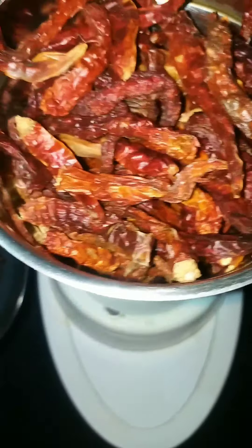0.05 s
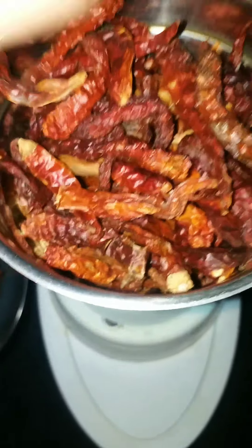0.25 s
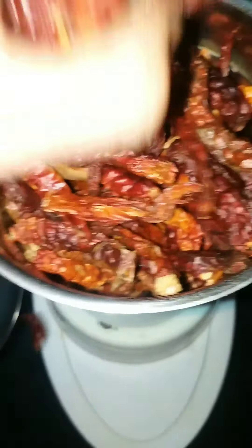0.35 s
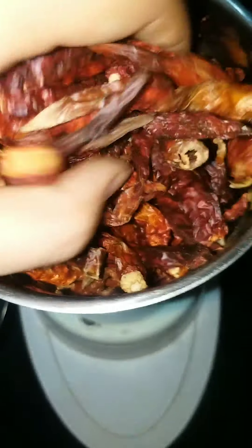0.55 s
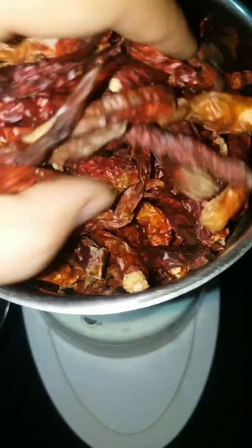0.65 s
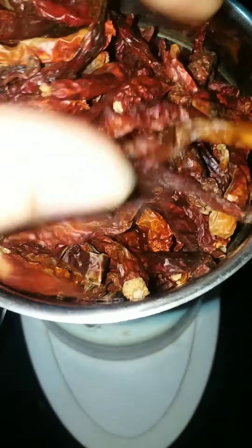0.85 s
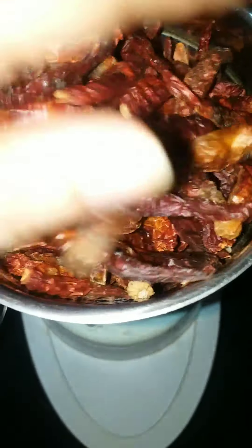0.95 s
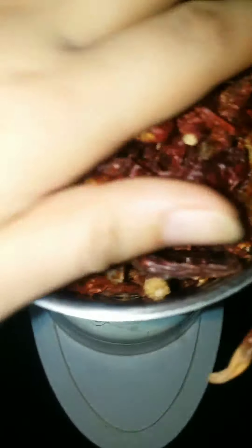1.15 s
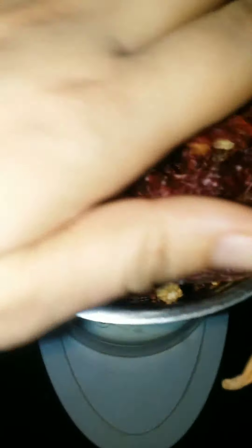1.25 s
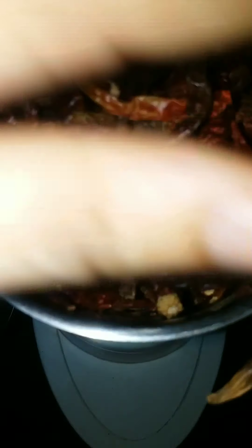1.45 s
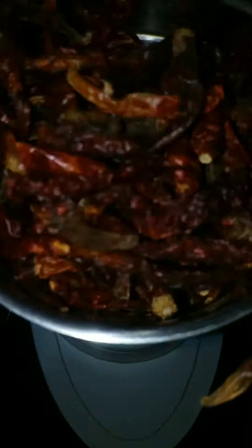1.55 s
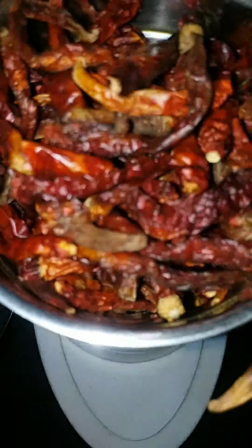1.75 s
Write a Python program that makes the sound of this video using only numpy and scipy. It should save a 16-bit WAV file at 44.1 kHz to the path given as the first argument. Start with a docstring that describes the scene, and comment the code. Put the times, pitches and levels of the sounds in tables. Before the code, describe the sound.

Brittle dried chilli pods rustle, snap and tick together, lifted by hand in a metal bowl.

```python
"""A kitchen, close up: a hand digs into dried chillies in a steel bowl, lifts them, lets them slide back.
The hollow pods snap and ring briefly, their papery skins crackle, and the heap shifts in the bowl.
A pod rubs the steel and makes it sing. The room adds a short echo and the low hum of an appliance."""
import sys
import numpy as np
from scipy import signal
from scipy.fft import rfft, irfft, next_fast_len
from scipy.io import wavfile
from scipy.ndimage import uniform_filter1d, map_coordinates

SR = 44100
rng = np.random.default_rng(int(sys.argv[2]) if len(sys.argv) > 2 else 0)


def dump_mix(stems):
    """Bounce the given channels to the path in sys.argv[1] as a 16-bit WAV at rate SR."""
    frames = np.atleast_2d(stems).T  # one column per channel
    limited = np.clip(frames, -1, 1)  # hard clip at full scale
    pcm = np.round(limited * 32767).astype(np.int16)
    wavfile.write(sys.argv[1], SR, pcm)


N = 79380  # 1.8 s


def snaps():
    """Each snap rings a hollow pod and cracks its skin; hard ones thud into the heap."""
    # start_s, body_db, pitch_hz, ring_t60_s, crack_db, pan_db
    events = [(0.0266, -40, 3380, 0.0098, -58, 1), (0.0745, -49.5, 3120, 0.011, -54, 1),
              (0.1734, -28.5, 3710, 0.0067, -38.5, -8), (0.1778, -31, 3000, 0.0093, -43.5, 5.5),
              (0.2268, -21.5, 3280, 0.0057, -24.5, -3), (0.2281, -23, 3240, 0.012, -23, -9),
              (0.2449, -12, 4650, 0.0078, -22.5, -7.5), (0.251, -17, 3270, 0.0087, -24, -6.5),
              (0.3075, -39, 3420, 0.0052, -35, 6), (0.3572, -41, 4970, 0.0064, -29.5, -1),
              (0.373, -25.5, 7270, 0.0078, -42, 1), (0.3807, -25.5, 7300, 0.007, -32, 5),
              (0.401, -26, 3350, 0.0094, -39, -2.5), (0.4031, -26, 5100, 0.0047, -21, 2),
              (0.4478, -25.5, 5580, 0.0084, -24.5, 7.5), (0.473, -26.5, 6830, 0.012, -30.5, -1),
              (0.4902, -33, 5600, 0.0065, -38, -1), (0.5433, -38, 6430, 0.009, -40, 7),
              (0.5856, -26, 4320, 0.0081, -33.5, 12), (0.59, -38.5, 3530, 0.007, -36.5, 6),
              (0.605, -24, 3450, 0.0074, -38.5, -13), (0.6072, -29.5, 3140, 0.016, -38.5, -3),
              (0.669, -38, 5450, 0.007, -44, 9.5), (0.6925, -38, 3500, 0.0058, -46, 8.5),
              (0.73, -41, 7300, 0.0064, -28, 0), (0.7317, -42, 5160, 0.007, -33, 1),
              (0.7577, -47, 3880, 0.0057, -42.5, 1.5), (0.7865, -42.5, 4984, 0.017, -25, -3),
              (0.7892, -36.5, 5020, 0.027, -31.5, 0), (0.8192, -34, 5500, 0.007, -30.5, -1),
              (0.823, -35.5, 5140, 0.024, -37.5, -3.5), (0.8365, -33, 5400, 0.0077, -56, -9),
              (0.8684, -30, 5540, 0.012, -49.5, -6), (0.915, -32.5, 3490, 0.0074, -36.5, 1),
              (0.9502, -39, 3800, 0.0081, -38, 1.5), (1.141, -47.5, 3980, 0.0094, -51, 1),
              (1.2018, -50, 3430, 0.01, -51.5, 2), (1.2323, -37, 4000, 0.01, -40, 1),
              (1.2793, -34, 3140, 0.011, -35.5, -2.5), (1.3107, -42, 4370, 0.01, -48, -1),
              (1.3867, -48.5, 4620, 0.011, -71, -9)]
    # pod modes: pitch_ratio, level_db, t60_ratio
    pod_modes = [(.78, -13, 0.87), (1.001, 2, 1), (1.17, -10, 0.89), (1.4, -13, 0.52), (1.75, -14.5, 0.61)]
    # noise spectra of shell, crack and thud: freq_hz, level_db
    shell_shape = [(1500, -28.5), (2400, -18.5), (3000, -6.5), (3500, 3.5), (4400, -2.5), (5700, -4),
                   (7000, -9), (16000, -39.5)]
    crack_shape = [(2000, -22), (5000, -3.5), (8000, -2), (12000, -1.5), (16000, -2)]
    thud_shape = [(150, -15.5), (350, -7), (600, 0), (950, -1), (1150, 6), (1330, 5), (1600, -13),
                  (2300, -5), (3500, -20)]
    attack_s, drift_step_rad = 0.00036, 0.091
    hard_snap_db, thud_db_per_db = -13.5, 0.49
    t = np.arange(SR // 20) / SR

    def fade(t60_s):
        return amp(-60 * t / t60_s) * (1 - np.exp(-t / attack_s))

    def burst(shape, t60_s):
        return unit(colour(rng.standard_normal((2, len(t))), shape)) * fade(t60_s)

    def rough_sine(hz):
        phase = 2 * np.pi * rng.random() + drift_step_rad * np.cumsum(rng.standard_normal(len(t)))
        return np.sin(2 * np.pi * hz * t + phase)

    out = np.zeros((2, N + SR))
    for start_s, body_db, pitch_hz, ring_t60_s, crack_db, pan_db in events:
        ring = sum(amp(level_db) * fade(ring_t60_s * t60_ratio) * rough_sine(pitch_hz * pitch_ratio)
                   for pitch_ratio, level_db, t60_ratio in pod_modes)
        thud = amp(-12.5 + thud_db_per_db * (body_db - hard_snap_db)) * burst(thud_shape, t60_s=0.039)
        shell = amp(1) * burst(shell_shape, t60_s=0.012)
        body = amp(body_db) * (amp(6) * ring + shell + thud)
        crack = amp(crack_db + 9.5) * burst(crack_shape, t60_s=0.014)
        start = int(start_s * SR)
        out[:, start:start + len(t)] += sides(pan_db) * (body + crack)
    return out[:, :N]


def rustle():
    """Pods tick together, skins crackle and the heap shifts in the bowl."""
    # pod-on-pod rubbing and papery treble: time_s, level_db
    stir_levels = [(0, -59.5), (.16, -60.5), (.2, -50), (.24, -41), (.3, -36), (.345, -43.5), (.4, -29),
                   (.44, -36.5), (.48, -34), (.54, -45), (.6, -40.5), (.68, -42), (.74, -45.5), (.775, -54),
                   (.81, -43), (.85, -44.5), (.9, -47.5), (.94, -37.5), (1.02, -43.5), (1.085, -60),
                   (1.14, -60.5), (1.18, -65), (1.23, -46), (1.31, -45), (1.36, -59.5), (1.42, -66.5),
                   (1.5, -67.5), (1.74, -69), (1.8, -63)]
    skin_levels = [(0, -76), (.165, -76), (.18, -66), (.205, -61), (.213, -49), (.222, -55), (.24, -47.5),
                   (.3, -37.5), (.345, -57), (.385, -28.5), (.42, -37.5), (.46, -43), (.52, -44),
                   (.58, -43.5), (.63, -48), (.675, -41), (.715, -50.5), (.75, -54), (.775, -60),
                   (.81, -50), (.85, -42.5), (.9, -47), (.94, -37), (1.0, -42), (1.04, -44.5), (1.085, -72),
                   (1.115, -72.5), (1.145, -51.5), (1.18, -70.5), (1.22, -46), (1.3, -49), (1.36, -61.5),
                   (1.41, -63.5), (1.47, -76), (1.74, -78.5), (1.77, -60), (1.8, -72)]
    # spectra of ticks, skins and heap: freq_hz, level_db
    tick_shape = [(1000, -15.5), (2200, -10), (3000, 1), (3500, 2.5), (4400, -0.5), (5600, -2.5),
                  (7000, -5.5), (10000, -26.5), (16000, -26.5)]
    skin_shape = [(1500, -15.5), (4000, -1.5), (6500, 2.5), (8000, 0), (9500, -1.5), (11000, 3.5),
                  (13000, -1.5), (16000, -3)]
    heap_shape = [(60, -28), (150, -13), (260, -8), (450, 3), (850, -5), (1100, -1), (1330, 0), (1600, 1.5),
                  (1900, -6), (3000, -7), (6000, -36.5)]
    usual_stir_db, heap_db_per_db = -42, 0.54
    ticks = crackle(tick_shape, per_s=650, spread_db=3.5, t60_s=0.006, lean_db=6.5, bed_power=0.33)
    skin = crackle(skin_shape, per_s=1600, spread_db=5, t60_s=0.00477, lean_db=3.5, bed_power=0.35)
    heap = crackle(heap_shape, per_s=260, spread_db=1, t60_s=0.018, lean_db=-3, bed_power=0.63)
    stir_db = curve(stir_levels)
    heap_db = usual_stir_db + heap_db_per_db * (stir_db - usual_stir_db)
    return (amp(stir_db - 1) * ticks * sides(pan_db=4.5)
            + amp(curve(skin_levels) + 2.5) * skin * sides(pan_db=6)
            + amp(heap_db - 8.5) * heap * sides(pan_db=-7))


def crackle(shape, per_s, spread_db, t60_s, lean_db, bed_power):
    """Tiny random noise bursts over a steady bed; stereo, rms 1. Positive lean_db favours the right."""
    when, strength, place = rng.random((8000, 3))[:int(per_s * N / SR)].T
    size = amp(spread_db * np.minimum(-np.log(1 - strength), np.pi))  # capped exponential spread
    lean = amp(lean_db * (place - 1))
    starts = (when * N).astype(int)
    hits = np.array([np.bincount(starts, gain ** 2, N) for gain in (size * lean, size / lean)])
    power_decay = amp(-60 * np.arange(SR // 20) / SR / t60_s) ** 2
    power = np.abs(signal.fftconvolve(hits, power_decay[None], axes=1)[:, :N])
    power /= np.abs(uniform_filter1d(power.mean(0), SR // 20)) + 1e-9  # levelled over 50 ms
    noise = rng.standard_normal((3, N))
    carrier = noise[:2] + 0.34 * noise[2]  # partly common to both sides
    return unit(colour(np.sqrt(power + bed_power) * carrier, shape))


def bowl():
    """A rubbing pod makes the bowl sing, skin squeaks on the steel, and the hand shakes it dully."""
    # pod rubbing on steel: time_s, level_db
    rub_levels = [(0, -71), (.11, -68.5), (.135, -55), (.17, -56.5), (.205, -55.5), (.22, -43.5),
                  (.232, -44.5), (.25, -63.5), (.33, -85)]
    # bowl modes: pitch_hz, width_hz, level_db
    bowl_modes = [(570, 130, -9), (936, 50, 2), (994, 60, 4), (1330, 100, -12.5), (1910, 195, -11)]
    # handling: time_s, level_db
    shake_levels = [(0, -69), (.18, -57), (.3, -53), (.5, -57), (.62, -60), (.75, -52.5), (.9, -52.5),
                    (1.0, -57), (1.1, -73), (1.25, -58.5), (1.45, -73), (1.8, -68)]
    # handling spectrum: freq_hz, level_db
    shake_shape = [(45, -23), (70, 0), (130, -0.5), (200, -2), (260, -14), (340, -1.5), (480, -7),
                   (800, -28.5), (2000, -51)]
    # start_s, length_s, pitch_hz, level_db
    squeaks = [(.211, .013, 1930, -43), (0.214, 0.025, 1012, -42)]
    f, t = np.fft.rfftfreq(N, 1 / SR), np.arange(N) / SR
    response = sum((-1) ** k * amp(db) * 1j * f * width_hz / (hz * hz - f * f + 1j * f * width_hz)
                   for k, (hz, width_hz, db) in enumerate(bowl_modes))
    rub = unit(irfft(rfft(rng.standard_normal(N)) * response, N))
    shake = unit(colour(rng.standard_normal(N), shake_shape))
    out = amp(curve(rub_levels)) * rub + amp(curve(shake_levels)) * shake
    for start_s, length_s, pitch_hz, level_db in squeaks:
        arch = np.sin(np.pi * np.clip((t - start_s) / length_s, 0, 1))
        out += amp(level_db) * arch * np.sin(2 * np.pi * pitch_hz * t + 0.5 * wobble(400))
    return out * sides(pan_db=-1.5)


def kitchen_echo(x):
    """Diffuse tail, each frequency dying at its own rate."""
    # freq_hz, t60_s
    decay_times = [(100, 0.1), (300, 0.44), (1000, 0.6), (4000, 0.28), (9000, 0.24), (16000, 0.33)]
    hz, t, spectra = signal.stft(rng.standard_normal((2, SR // 2)), SR, nperseg=256)
    decay = amp(-60 * t / along(decay_times, hz)[:, None])
    tail = signal.istft(spectra * decay, SR, nperseg=256)[1]
    return signal.fftconvolve(x, tail / np.linalg.norm(tail[0]), axes=1)[:, :N]


def room_air():
    """Steady air noise, alike on both sides in the bass."""
    # air spectrum: freq_hz, level_db
    air_shape = [(15, -58), (25, -35), (70, -11.5), (84, -3.5), (145, -3.5), (223, -7.5), (263, -24.5),
                 (394, -6), (531, -19.5), (575, -6.5), (624, -18.5), (936, -9), (1070, -12), (1480, -19.5),
                 (1610, -7.5), (2000, -30), (5880, -28.5), (12200, -53), (16000, -30.5)]
    # left-right likeness: freq_hz, correlation
    likeness = [(100, 1), (300, .85), (800, 0), (2000, 0), (8000, 0.2)]
    air = colour(rng.standard_normal((2, N)), air_shape)
    mid = colour(air[0], [(hz, 10 * np.log10(1 + min(c, 0.99))) for hz, c in likeness])
    side = colour(air[1], [(hz, 10 * np.log10(1 - min(c, 0.99))) for hz, c in likeness])
    return amp(-57.5) * unit(np.array([mid + side, mid - side]))


def appliance_hum():
    """Faint tones wavering in level and phase."""
    # pitch_hz, rms_db
    tones = [(97, -63), (400, -68), (437, -74.5), (1600, -78.5)]
    t = np.arange(N) / SR
    out = np.zeros(N)
    for pitch_hz, rms_db in tones:
        peak = np.sqrt(2) * amp(rms_db + 2.84 * wobble(8.9))
        out += peak * np.sin(2 * np.pi * pitch_hz * t + 0.6 * wobble(9.44))
    return out


def amp(db):
    """Decibels to gain."""
    return 10 ** (np.asarray(db) / 20)


def unit(x):
    """Scale to rms 1."""
    return x / np.sqrt(np.mean(x ** 2) + 1e-20)


def along(points, hz):
    """Read (freq_hz, value) points on a log frequency axis."""
    freqs_hz, values = np.transpose(points)
    return np.interp(np.log(hz + 1), np.log(freqs_hz + 1), values)


def curve(points):
    """(time_s, value) points to one value per sample."""
    return np.interp(np.arange(N) / SR, *np.transpose(points))


def wobble(knots_per_s):
    """Smooth random curve."""
    knots = rng.standard_normal(int(N * knots_per_s / SR) + 4)
    return map_coordinates(knots, [np.arange(N) * knots_per_s / SR])


def sides(pan_db):
    """Constant-power stereo gains; pan_db is left minus right."""
    return unit(amp([[pan_db / 2], [-pan_db / 2]]))


def colour(x, shape):
    """Minimum-phase filter through (freq_hz, level_db) points."""
    n_fft = next_fast_len(x.shape[-1] + 4096)
    gain = amp(along(shape, np.fft.rfftfreq(n_fft, 1 / SR)))
    cepstrum = irfft(np.log(gain), n_fft)
    cepstrum[1:n_fft // 2] *= 2
    cepstrum[n_fft // 2 + 1:] = 0
    return irfft(rfft(x, n_fft) * np.exp(rfft(cepstrum)), n_fft)[..., :x.shape[-1]]


def scene():
    """Chillies and echo at two microphones, the right shaded in the treble, over air and hum."""
    # right microphone response: freq_hz, gain_db
    right_mic = [(100, 0), (5500, 1), (6700, -8), (7400, -19), (8200, -12), (10200, -10.5), (11800, -4.5),
                 (16000, -9.5)]
    snapping = snaps()
    stirring = rustle() + bowl()
    echo = kitchen_echo(amp(-6) * snapping + amp(-8.5) * stirring)
    left, right = snapping + stirring + echo
    background = (room_air() + appliance_hum()) * sides(pan_db=-4.5)
    return np.array([left, colour(right, right_mic)]) + background


def record(dry):
    """Low cut, soft clip, band limit."""
    low_cut_hz, ceiling, top_hz = 49, 0.88, 15900
    thinned = signal.sosfilt(signal.butter(4, low_cut_hz, "highpass", fs=SR, output="sos"), dry)
    clipped = thinned / (1 + (thinned / ceiling) ** 8) ** (1 / 8)
    n_fft = next_fast_len(N + SR // 2)
    passband = np.fft.rfftfreq(n_fft, 1 / SR) < top_hz
    return irfft(rfft(clipped, n_fft) * passband, n_fft)[:, :N]


dry = scene()
out = record(dry)
dump_mix(out)
```